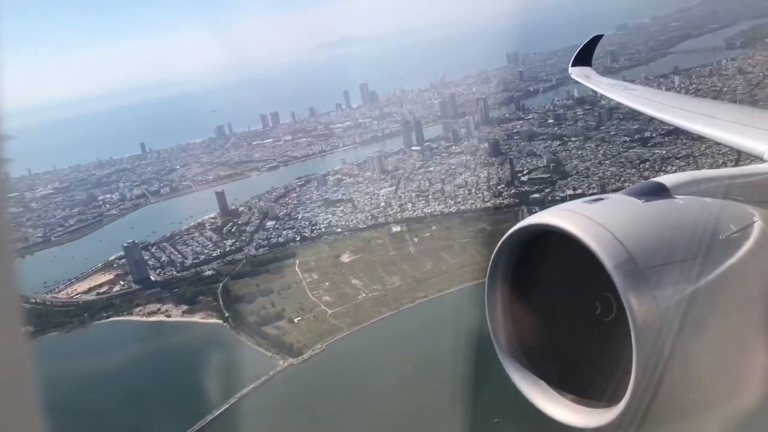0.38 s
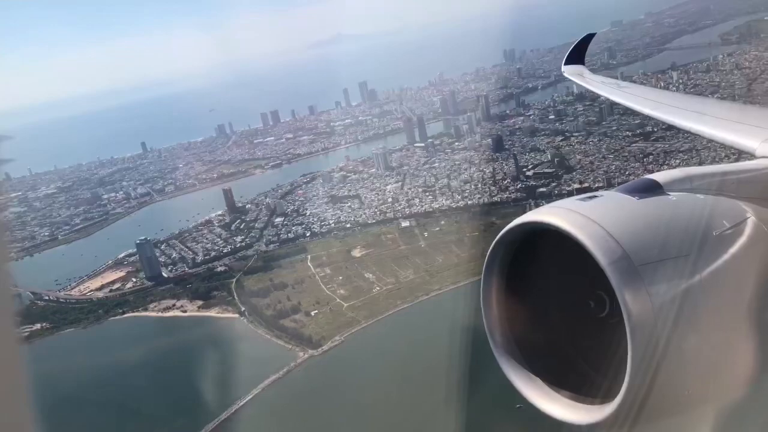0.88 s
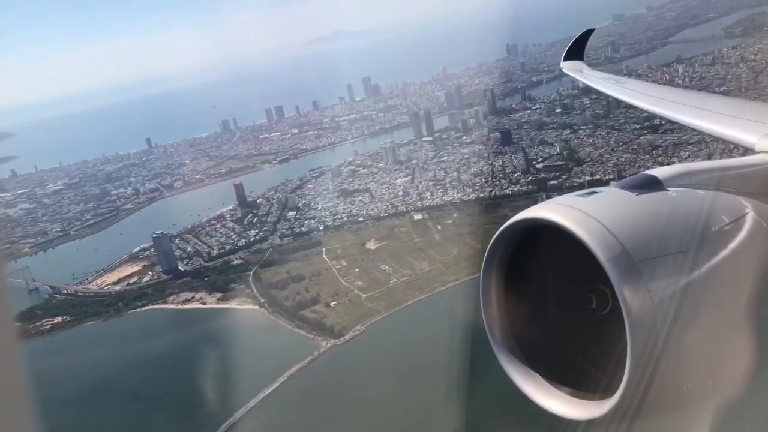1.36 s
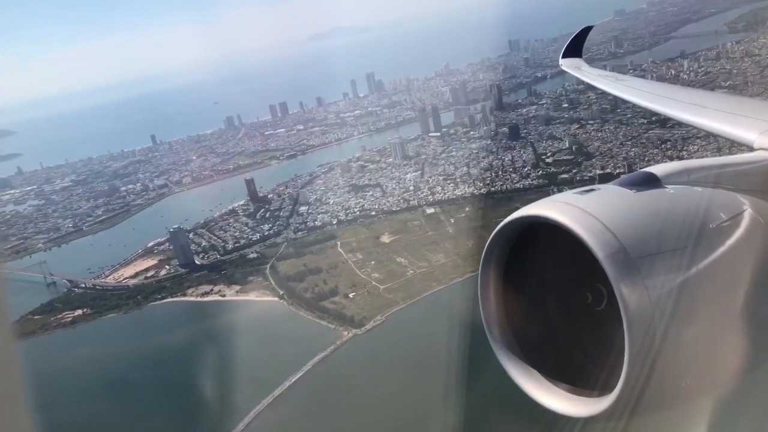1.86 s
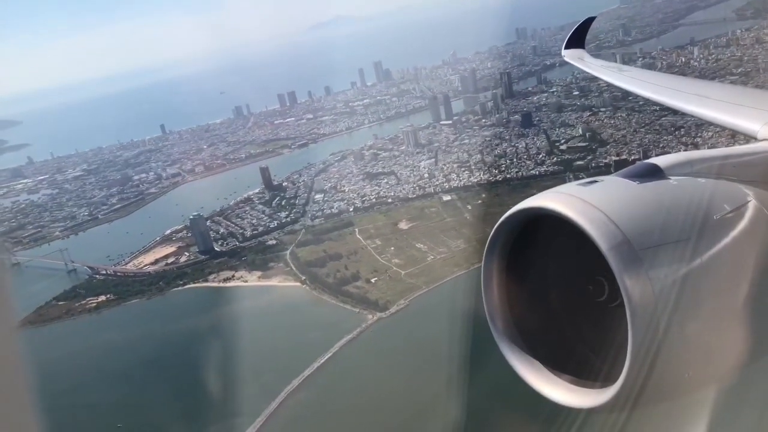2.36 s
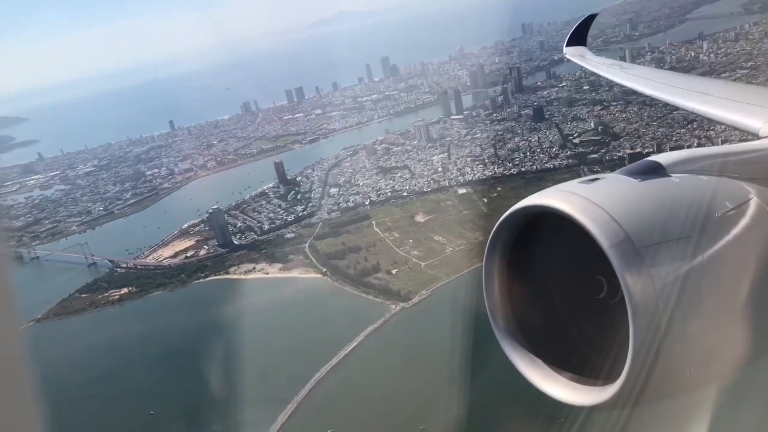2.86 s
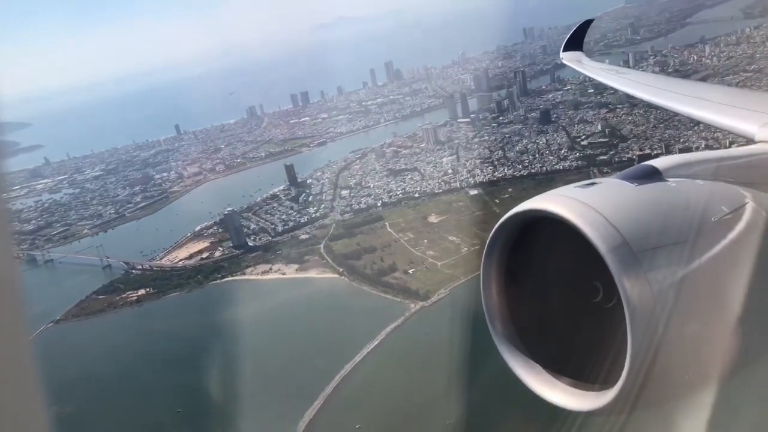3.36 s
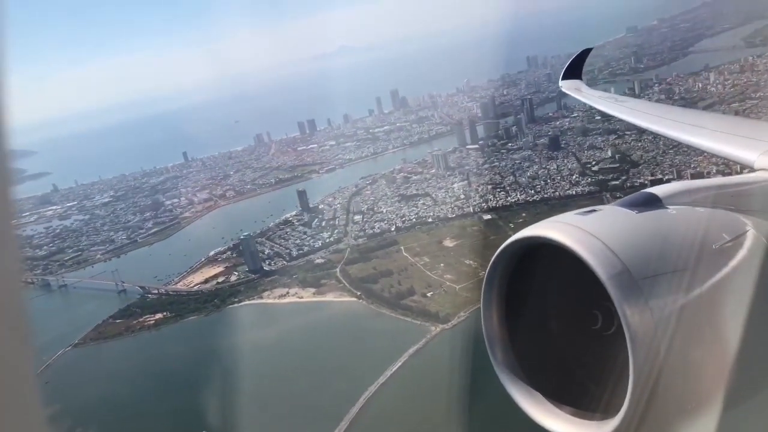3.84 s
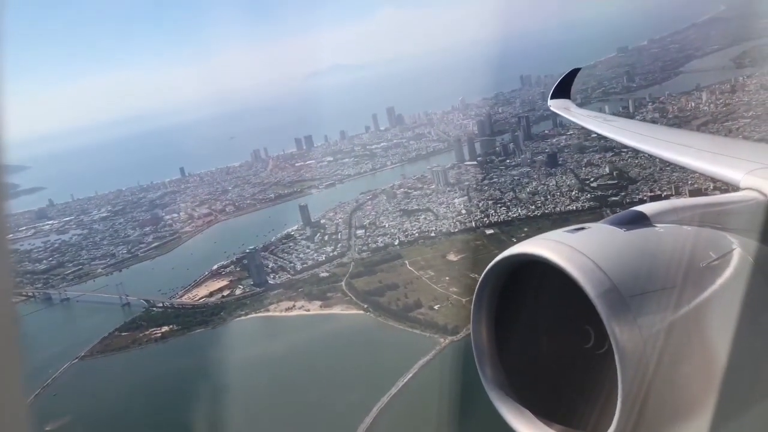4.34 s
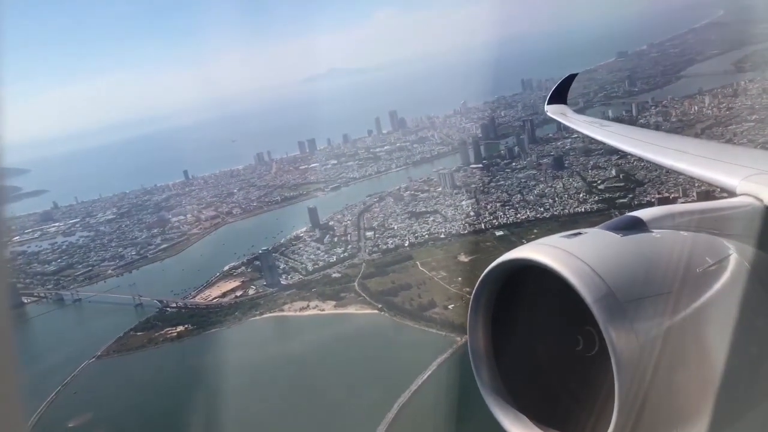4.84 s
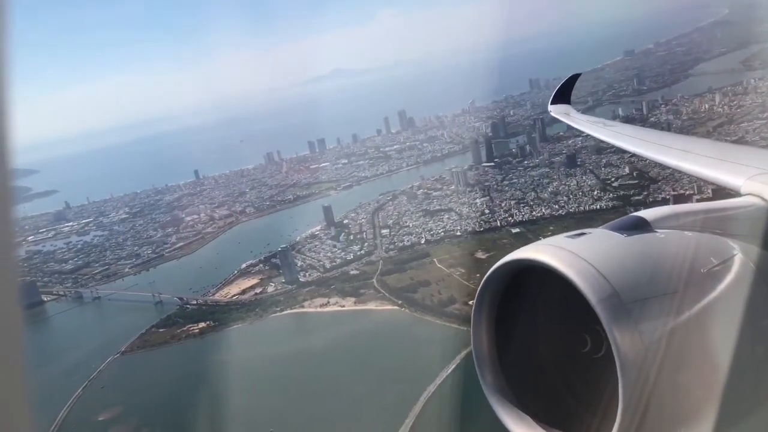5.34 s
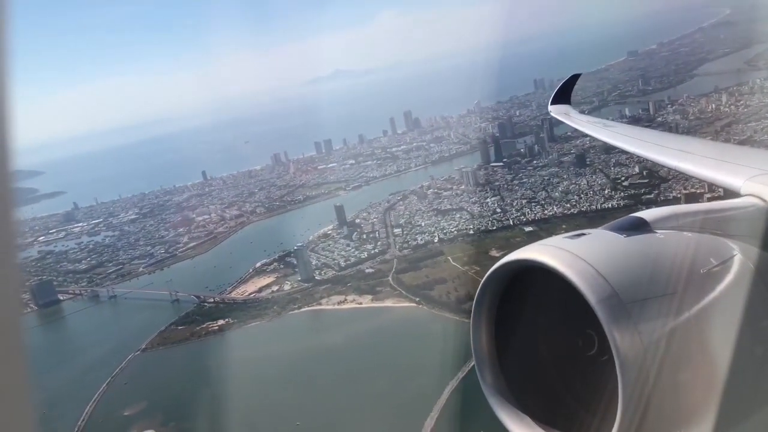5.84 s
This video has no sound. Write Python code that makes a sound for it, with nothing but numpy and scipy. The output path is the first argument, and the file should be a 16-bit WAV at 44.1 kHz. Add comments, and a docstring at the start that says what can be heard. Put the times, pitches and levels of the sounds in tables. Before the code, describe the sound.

Heard from inside an airliner cabin in climb: two large turbofans hold a steady, low buzzing drone with slow beating. Dull jet rumble and air rush come through the wall. A small tick on the handheld microphone at half a second and faint rubs later are the only events.

```python
"""A steady buzz-saw drone fills an airliner cabin during climb: the supersonic tips of two big fans sound a series
of tones on multiples of the shaft speed. The fans turn a few rpm apart, so the tones they share beat.
Jet rumble and the air rushing along the skin, shaped noise, come dully through the wall. An inner shaft hums as
one sine, filtered noise makes a faint high whine that grows in, and the hand holding the microphone
ticks and rustles faintly: short noise bursts and grainy rubs, ringing the case."""
import sys
import numpy as np
from scipy import signal
from scipy.fft import rfft, irfft, next_fast_len
from scipy.io import wavfile

SR = 44100
rng = np.random.default_rng(int(sys.argv[2]) if len(sys.argv) > 2 else 0)


def persist_wave(psi):
    """Save psi, clipped to +-1, as 16-bit WAV."""
    counts = np.round(np.clip(psi, -1, 1) * 32767).astype(np.int16)
    wavfile.write(sys.argv[1], SR, np.atleast_2d(counts).T)


def natural_amplitude(level_db):
    """Convert a level in decibels to a linear amplitude factor, elementwise."""
    exponent = np.asarray(level_db, float) / 20
    return 10 ** exponent


N = 262836   # length in samples
THROB_ORDER = 9   # shaft order at the middle of the near fan's throb


def in_time(rows):
    """Joins the points of a table with straight lines; the first column is seconds, each other one a curve."""
    s, *columns = np.transpose(rows)
    return [np.interp(np.arange(N) / SR, s, c) for c in columns]


def drift(rate_hz):
    """Slow chance of spread 1: sparse noise through a double one-pole low-pass."""
    hop = 200   # samples between the sparse points
    r = np.exp(-2 * np.pi * rate_hz * hop / SR)
    noise = rng.standard_normal(N // hop + 502)
    slow = signal.lfilter([1], [1, -2 * r, r * r], noise)[500:]   # without the filter's settling
    return np.interp(np.arange(N) / hop, np.arange(len(slow)), slow / slow.std())


def resonance(x, hz, width_hz):
    """Two-pole band-pass with gain 1 on top."""
    r = np.exp(-np.pi * width_hz / SR)
    feedback = [1, -2 * r * np.cos(2 * np.pi * hz / SR), r * r]
    return signal.lfilter([(1 - r * r) / 2, 0, (r * r - 1) / 2], feedback, x)


def tone(turns, level_db, start=None):
    """A sine of given rms level; its path through turbulent air and wall makes it waver."""
    waver_db = 0.33 * drift(1.3)
    start = rng.random() if start is None else start   # in turns
    return np.sqrt(2) * natural_amplitude(level_db + waver_db) * np.cos(2 * np.pi * (turns + start))


def wall_lag(order):
    """The near fan's strong low orders form one throb a turn, spread in time by the bending wall."""
    spread_turns = 0.04   # per squared distance from the middle order
    if 6 <= order <= 14:
        return -spread_turns * (order - THROB_ORDER) ** 2
    return None   # the other orders start at random


def fans():
    """The shock pattern repeats once per turn: sines on shaft orders, for each fan."""
    # Speed of the fan shafts. Each row: time in seconds, near fan in rpm, far fan in rpm.
    shafts = [(0.0, 2261.49, 2264.32), (0.7, 2261.13, 2264.9), (1.2, 2261.58, 2266.91),
              (1.8, 2261.52, 2264.32), (2.4, 2262.06, 2264.93), (3.0, 2263.01, 2265.33),
              (3.6, 2260.97, 2267.39), (4.1, 2261.61, 2266.08), (4.6, 2262.33, 2265.51),
              (5.3, 2262.26, 2265.46), (5.96, 2262.43, 2264.84)]
    # Tones of each fan, started independently; some orders sound in both. Blades differ slightly, so the
    # orders are uneven. Each row: shaft order, rms level in dB (for the near fan, at the middle of its sag).
    near_orders = [(6, -28.5), (8, -21.5), (10, -36.5), (11, -47), (12, -49.5), (13, -40.5), (14, -39.5),
                   (15, -51), (16, -50), (17, -54), (18, -50.5), (19, -55.5), (20, -51.5), (21, -53.5),
                   (24, -53), (29, -67), (30, -61.5), (31, -53), (32, -59), (34, -60), (35, -61),
                   (36, -67.5), (37, -57.5), (38, -60.5), (39, -58.5), (42, -57.5), (44, -70.5),
                   (47, -66.5), (51, -64.5), (52, -62.5), (53, -67.5), (55, -71), (58, -68.5), (64, -67.5),
                   (65, -68.5), (66, -55.5), (67, -65), (69, -57), (73, -60), (74, -61), (75, -57.5),
                   (76, -65.5), (77, -66), (78, -71.5), (79, -68.5), (80, -67), (81, -60), (82, -67.5),
                   (83, -63.5), (85, -75), (86, -67), (88, -56.5), (89, -61.5), (90, -63.5), (92, -73),
                   (93, -61.5), (95, -63.5), (96, -72.5), (97, -63), (98, -77.5), (99, -76.5), (100, -75.5),
                   (101, -60.5), (102, -72.5), (104, -63.5), (105, -65), (107, -69), (108, -76),
                   (109, -79.5), (110, -77), (111, -83.5), (112, -72), (113, -80.5), (114, -79), (115, -72),
                   (117, -77), (118, -72), (119, -77.5), (121, -72), (122, -70.5), (123, -81), (125, -81),
                   (127, -78), (128, -66.5), (131, -73.5), (132, -77.5), (134, -77.5)]
    far_orders = [(1, -44.5), (4, -33.5), (11, -56), (12, -65.5), (15, -61), (16, -55), (17, -55),
                  (19, -58), (20, -64), (23, -57), (24, -61.5), (25, -56.5), (30, -64.5), (38, -60.5),
                  (44, -67.5), (48, -57.5), (50, -59), (52, -71.5), (56, -62), (58, -60), (61, -58.5),
                  (63, -64.5), (65, -67), (70, -61), (75, -66), (78, -71), (82, -69), (84, -71.5),
                  (86, -67), (96, -76.5), (100, -74.5), (108, -75)]
    # Orders whose beat between the fans has a set moment. Each row: shaft order, near fan rms in dB,
    # far fan rms in dB, a moment in seconds when the two are in step.
    beating_orders = [(2, -35, -30, 1.1), (3, -28.5, -32, 0.7), (5, -49, -35.5, 1.4),
                      (7, -36.5, -33.5, 3.606), (9, -28.0, -39, 1.76), (22, -48, -50, 2.764)]
    # The near fan's high orders in its own table fade slowly: the rate goes in proportion to order.
    sag_order, sag_db_per_s, sag_middle_s = 66, 0.5, 2.4

    near, far = (np.cumsum(rpm) / (60 * SR) for rpm in in_time(shafts))   # turns so far
    sag_db = -sag_db_per_s * (np.arange(N) / SR - sag_middle_s)
    out = np.zeros(N)
    for order, db in near_orders:
        order = round(order)
        out += tone(order * near, db + sag_db * order / sag_order, wall_lag(order))
    for order, db in far_orders:
        out += tone(round(order) * far, db)
    for order, near_db, far_db, in_step_s in beating_orders:
        order, at = round(order), round(in_step_s * SR)
        start = wall_lag(order) if order == THROB_ORDER else rng.random()
        far_in_step = far - far[at] + near[at]
        out += tone(order * near, near_db, start)
        out += tone(order * far_in_step, far_db, start)
    return out


def air():
    """Noise coloured by the wall; half-octave bands flicker a little, rumble and rush swell on their own."""
    # Rumble and airflow through the wall, before swell and flicker. Each row: frequency in Hz, level in dB per Hz.
    wall_colour = [(22, -72), (60, -50.5), (83, -47.5), (100, -40.5), (160, -51), (235, -47.5),
                   (400, -61.5), (800, -69), (1450, -74.5), (1680, -79), (1900, -77.5), (2700, -79),
                   (4900, -89.5), (6400, -101), (8000, -110), (10000, -116), (13000, -120), (15500, -118)]
    # Slow swell of the noise. Each row: time in seconds, rumble gain in dB, rush gain in dB.
    swell = [(0, -2.5, 1.5), (1.2, -1.5, 1.5), (2.4, -2, 1), (3.6, 2, 0.5), (4.8, -2, 1), (5.96, 1, 1.5)]
    rumble_top_hz = 406   # rumble and rush weigh the same here

    size = next_fast_len(N)
    hz = np.maximum(np.arange(size // 2 + 1) * SR / size, 1)
    colour_hz, colour_db = np.transpose(wall_colour)
    colour = natural_amplitude(np.interp(np.log(hz), np.log(colour_hz), colour_db))
    spectrum = rfft(rng.standard_normal(size)) * colour * np.sqrt(SR / 2)
    rumble_db, rush_db = in_time(swell)
    out, together = np.zeros(N), drift(4.4)
    for centre in 20 * 2 ** np.arange(0, 10.5, 0.5):
        share = np.clip(1 - 2 * abs(np.log2(hz / centre)), 0, 1)   # neighbouring shares add up to one
        band = irfft(spectrum * share, size)[:N]
        low = 1 / (1 + (centre / rumble_top_hz) ** 2)
        flicker_db = 0.23 * together + 1.1 * drift(8.9)
        out += natural_amplitude(low * rumble_db + (1 - low) * rush_db + flicker_db) * band
    return out


def inner_shaft():
    """The inner shaft hums once per turn."""
    return tone(127.2 * np.arange(N) / SR, -30.5)   # Hz, rms dB


def ring_case(x):
    """The microphone case answers touch with a few resonances side by side."""
    # What the case rings with. Each row: frequency in Hz, width in Hz, gain in dB.
    case_modes = [(6600, 900, 3.5), (8800, 900, 8.5), (10400, 500, 4.5), (11800, 770, 11),
                  (14500, 2500, -3)]
    return sum(natural_amplitude(db) * resonance(x, hz, width_hz) for hz, width_hz, db in case_modes)


def rubs():
    """Grainy rubs of the holding hand over a steady faint grain: part rings the case, part is plain broad hiss."""
    # Each row: start in seconds, hold in seconds, level in dB ahead of the resonances,
    # share that rings the case from 0 to 1.
    hand_rubs = [(0.123, .05, -79.5, .2), (0.502, .01, -80.5, .8), (1.563, 0.018, -72, .1),
                 (2.419, 0.056, -81.5, 0.2), (2.829, 0.4, -78, 0.9), (3.846, .04, -78, 0)]
    rise_s, fall_s = 0.015, 0.04   # time constants before and after the hold
    floor_db, grain_db = -91.5, 2.0   # steady touch on the case, spread of the grain's level

    t, ringing, plain = np.arange(N) / SR, natural_amplitude(floor_db), 0
    for s, hold_s, db, share in hand_rubs:
        early = np.maximum(s - t, 0) / rise_s
        late = np.maximum(t - s - hold_s, 0) / fall_s
        pressure = natural_amplitude(db) * np.exp(-early - late)
        share = np.clip(share, 0, 1)
        ringing = ringing + share * pressure
        plain = plain + (1 - share) * pressure
    grain = natural_amplitude(grain_db * drift(60.0)) * rng.standard_normal(N)
    skin = natural_amplitude(2.5) * resonance(plain * grain, 11000, 9000)   # broad hiss of skin: centre Hz, width Hz
    return ring_case(ringing * grain) + skin


def ticks():
    """Fingers tick on the case: short crackles of fading noise ring it."""
    # Each row: start in seconds, level in dB ahead of the case, fade time constant in ms.
    finger_ticks = [(.199, -63, 2.5), (.4955, -46, 1.6), (1.559, -62, 8.0), (3.85, -66, 5.0)]
    age_ms = np.arange(SR // 20) * 1e3 / SR
    out = np.zeros(N + SR)
    for s, db, fade_ms in finger_ticks:
        at = round(s * SR)
        fade = np.exp(-age_ms / max(fade_ms, 0.2))
        out[at:at + len(age_ms)] += natural_amplitude(db) * fade * rng.standard_normal(len(age_ms))
    return ring_case(out[:N])


def whine():
    """A faint narrow hiss whines high above and grows in: noise through the same resonance twice."""
    hz, width_hz, level_db = 9250, 450, -84   # rms level once grown, before its drift
    start_s, grow_s = 0.6, 1.5
    hiss = resonance(resonance(rng.standard_normal(N), hz, width_hz), hz, width_hz)
    grown = np.clip((np.arange(N) / SR - start_s) / grow_s, 0, 1)
    return grown * natural_amplitude(level_db + 1.5 * drift(1.5)) * hiss / hiss.std()


def scene():
    """All sources add up in one channel."""
    return (fans() + air() + inner_shaft() + rubs() + ticks() + whine())[None]


def band_limit(x):
    """A steep low-pass at the top of the band."""
    return signal.sosfilt(signal.butter(12, 15750, fs=SR, output="sos"), x)


def record(dry):
    """The microphone adds no colour to the finished mix before it is stored."""
    return band_limit(dry)


dry = scene()
out = record(dry)
persist_wave(out)
```